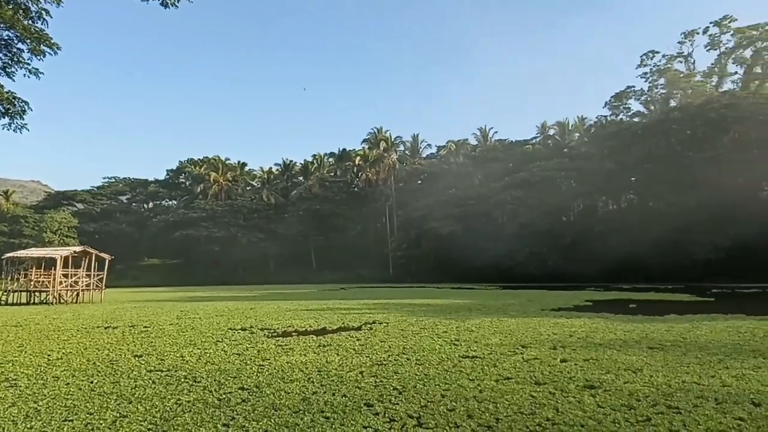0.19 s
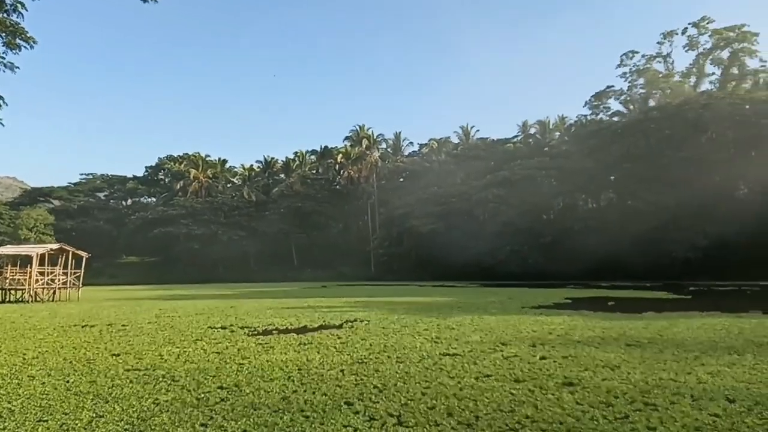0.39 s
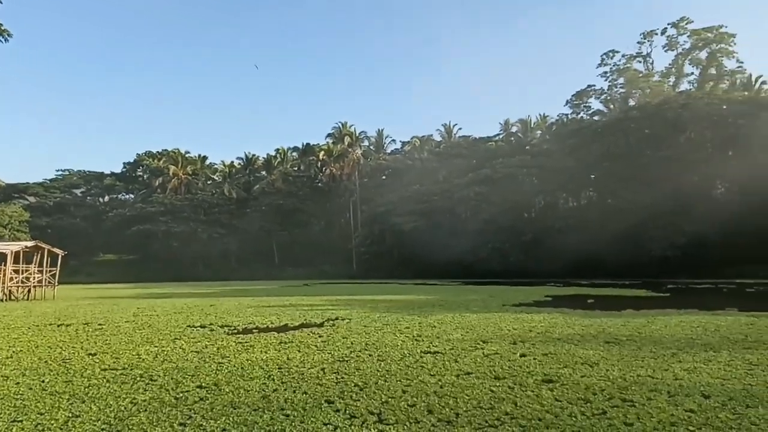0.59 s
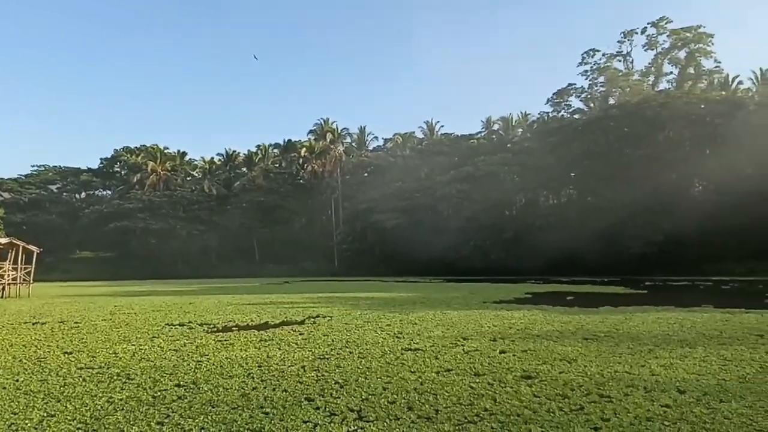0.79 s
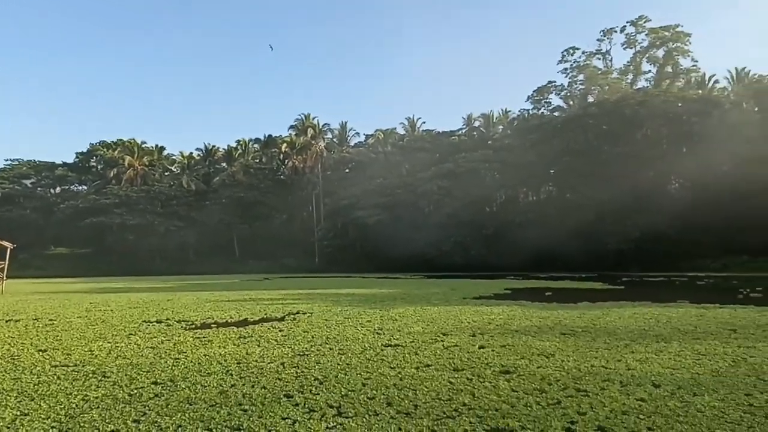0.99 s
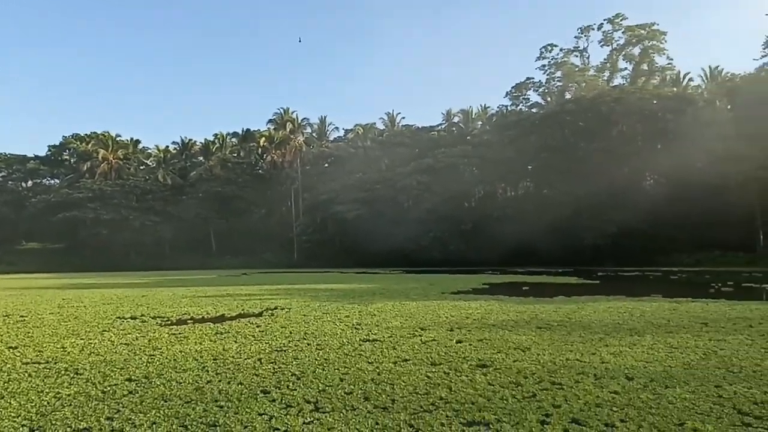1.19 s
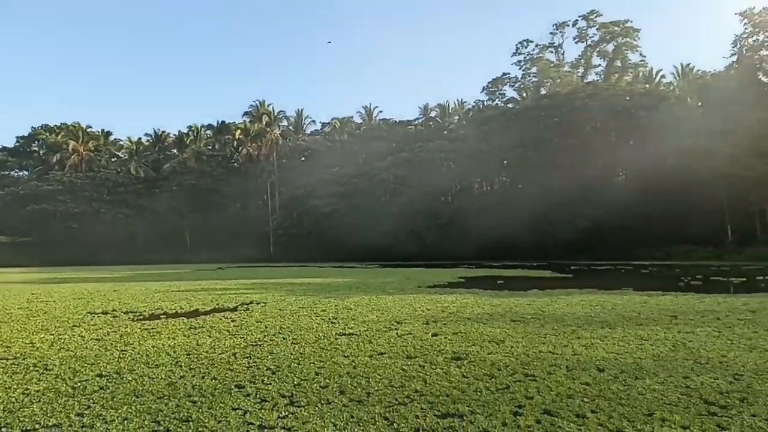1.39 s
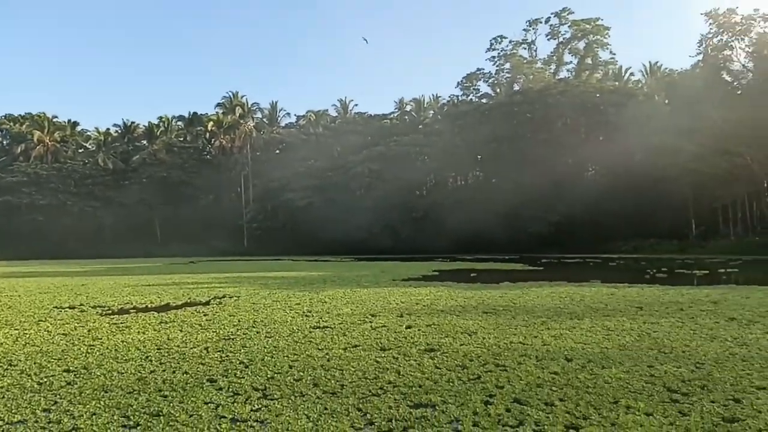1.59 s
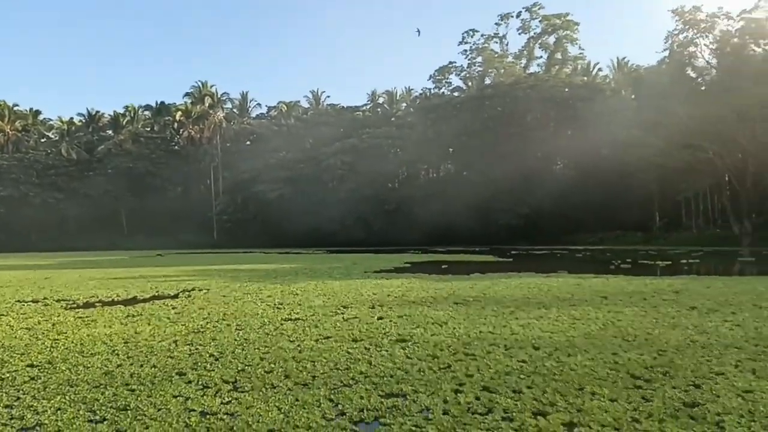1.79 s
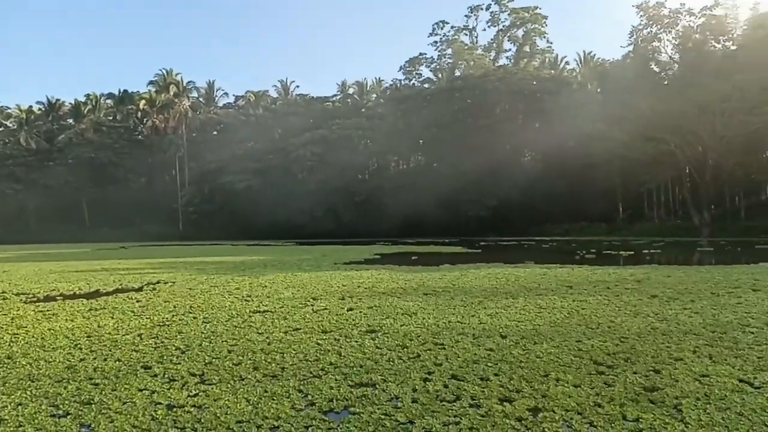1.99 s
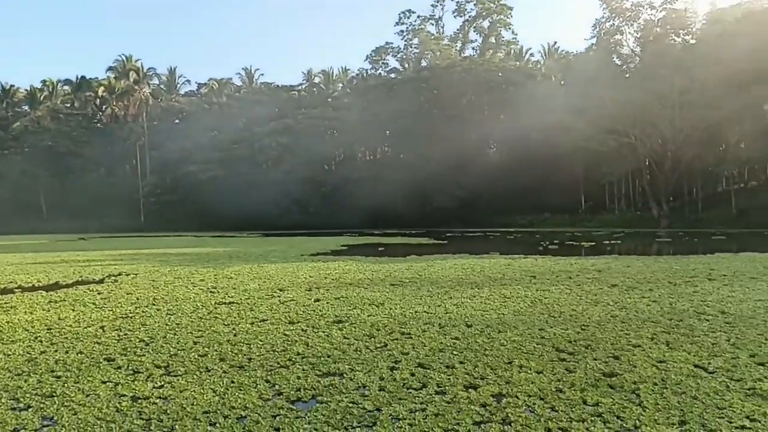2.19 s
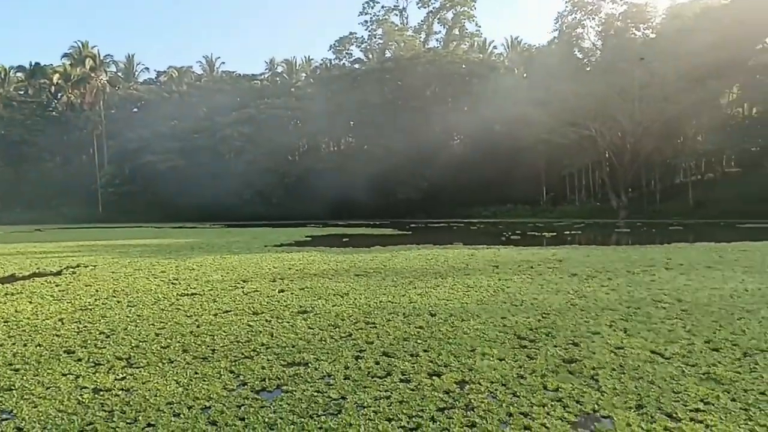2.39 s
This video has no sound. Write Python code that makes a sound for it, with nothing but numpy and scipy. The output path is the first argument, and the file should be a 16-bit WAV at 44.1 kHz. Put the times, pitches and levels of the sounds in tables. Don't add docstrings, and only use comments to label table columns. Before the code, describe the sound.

A distant hammer knocks on wood: faint taps from the start, a sharp hollow crack at 0.2 seconds, and rapid echoes off trees until about 0.35. Far quieter, birds whistle around 0.4, frogs pip until 1.0, and a chirp comes at 1.55. Hoarse hens squawk near 1.2 and 1.75; a frog coos at 1.9. Far birds, insects, low rumble and soft microphone air thumps lie beneath.

```python
import sys
import numpy as np
from scipy import signal
from scipy.fft import irfft
from scipy.io import wavfile
from scipy.ndimage import uniform_filter1d

SR = 44100
rng = np.random.default_rng(int(sys.argv[2]) if len(sys.argv) > 2 else 0)


def voltage_ratio(level):
    return 10 ** (np.asarray(level, float) / 20)


def put_to_file(sound):
    columns = np.atleast_2d(sound).T
    safe = np.clip(columns, -1, 1)
    whole_steps = np.round(safe * 32767)
    wavfile.write(sys.argv[1], SR, whole_steps.astype(np.int16))


N = 105840

# (time [s], peak level [dB])
KNOCKS = [(.001, -47), (0.07, -55), (.137, -53), (0.148, -50), (.2058, -27), (.2105, -29), (.224, -35),
          (.236, -38), (.2477, -30), (.2525, -34), (.266, -36), (0.272, -36), (.285, -39), (.302, -41),
          (.312, -44), (.335, -50)]
# (pitch [Hz], level [dB], fall time [s], 60 dB being lost in 0.7 of it)
WOOD_MODES = [(401.2, -13, 0.2), (517, -13, 0.08), (669, -20, 0.05), (1045, -1, 0.045), (1500, -12, .05),
              (1790, -1, 0.06), (2200, 0, 0.06), (2514, -8, .05), (3000, -4, 0.045), (3200, -8, .05),
              (3700, -3, 0.025)]
# (frequency [Hz], level [dB per Hz])
CRACK_COLOUR = [(150, -43), (400, -21), (1000, -9), (2200, -3), (3900, -20), (5000, -31), (8000, -48.5),
                (15000, -62)]
# (frequency [Hz], time to fall 60 dB [s])
SCATTER_T60 = [(300, .3), (1000, .17), (2500, .24), (10000, .08)]
# (time [s], length [s], from pitch [Hz], to pitch [Hz], level [dB])
WHISTLES = [(0.358, 0.03, 2780, 2940, -60), (.376, .06, 2950, 3020, -51), (.422, .093, 3040, 3130, -53.5),
            (.505, .06, 3140, 3270, -62), (0.418, .125, 3710, 3620, -54), (0.535, .125, 3660, 3620, -63),
            (.98, .04, 1920, 1850, -65), (1.012, 0.08, 1850, 1735, -57), (1.103, .02, 1715, 1690, -55),
            (1.128, .022, 1665, 1640, -55), (1.148, 0.055, 1620, 1490, -64), (1.219, 0.06, 3150, 3020, -65),
            (1.424, 0.068, 1755, 1706, -65), (1.476, .045, 2960, 2950, -63.5),
            (1.614, 0.129, 2850, 2743, -64), (1.775, 0.06, 2780, 3150, -62), (1.83, 0.088, 3200, 3240, -57),
            (1.935, 0.06, 3230, 3200, -68), (2.207, 0.089, 3590, 3660, -64),
            (2.287, 0.076, 3578, 3380, -58.5), (0.812, .06, 8120, 7700, -72), (.09, 0.057, 3540, 3400, -62)]
# (time [s], length [s], from pitch [Hz], to pitch [Hz], level [dB])
CHIRPS = [(1.24, .025, 2200, 2050, -58), (1.37, .03, 1700, 1450, -58), (1.535, .015, 2900, 2800, -60),
          (1.54, .018, 2050, 2300, -60), (1.555, .027, 2950, 2830, -46), (1.58, .03, 2800, 2600, -53),
          (1.895, .018, 1880, 1740, -55), (1.908, .03, 1750, 1450, -59), (1.95, .03, 2150, 2500, -63),
          (1.35, .03, 2250, 2350, -64), (.13, .02, 1060, 1050, -57), (1.905, .03, 2520, 2540, -64)]
# (time [s], length [s], from pitch [Hz], to pitch [Hz], level [dB])
RASPS = [(1.672, .05, 3350, 4000, -62), (1.672, .035, 3800, 4150, -63), (1.7, .07, 4150, 4150, -65),
         (1.983, .018, 4300, 3850, -63), (1.995, .028, 3800, 2950, -63), (2.033, .02, 3900, 4020, -59),
         (2.05, .045, 4000, 4170, -61), (2.03, .035, 3500, 3850, -64), (2.095, .04, 4150, 4100, -75),
         (.98, .06, 3200, 3050, -68), (1.02, .06, 2650, 2600, -69)]
# (time [s], peak level [dB])
TRILL = [(.523, -68), (.556, -66), (.590, -65), (.695, -68), (.768, -66), (.801, -65), (.838, -65),
         (1.010, -64), (1.045, -65), (1.080, -64), (1.254, -64), (1.289, -64), (1.324, -64)]
# (time [s], length [s], from pitch [Hz], to pitch [Hz], level [dB])
SQUAWKS = [
    (1.15, 0.04, 1800, 2300, -59),
    (1.179, 0.053, 2480, 2220, -52.5),
    (1.71, 0.025, 2000, 2130, -59),
    (1.718, 0.058, 2700, 2350, -54.5),
    (1.745, 0.055, 2250, 2070, -54.5),
    (1.79, .055, 2400, 2450, -62),
    (1.198, 0.13, 1700, 1627, -62.5),
]
# (time [s], peak level [dB])
PIPS = [
    (.381, -58),
    (.416, -54),
    (.499, -58.5),
    (.665, -56),
    (.755, -55.5),
    (.904, -58),
    (.988, -61),
]
# (time [s], length [s], pitch [Hz], level [dB])
COOS = [
    (0.091, 0.17, 720, -70),
    (0.6, 0.054, 740, -73.5),
    (0.73, 0.05, 780, -78),
    (.15, .04, 430, -66),
    (.42, 0.116, 470, -78),
    (.6, 0.078, 460, -77),
    (1.391, 0.1, 717, -73.5),
    (1.896, 0.11, 704.4, -64),
    (1.485, 0.039, 1070, -75.5),
]
# (frequency [Hz], level [dB per Hz])
FAR_COLOUR = [(700, -54), (1200, -16.5), (1700, 0.5), (2300, 3), (3100, -0.5), (3950, -2.5), (4250, -5),
              (5600, -37.5)]
# (time [s], level [dB])
FAR_LEVEL = [(0, -56), (.5, -59.5), (.85, -65.5), (1.2, -64), (1.45, -63.5), (1.75, -59.5), (2.05, -63),
             (2.4, -62.5)]
# (time [s], length [s], pitch [Hz], wing strokes [per s], level [dB])
BUZZES = [
    (1.8, .42, 9240, 67.9, -75),
    (0, .32, 9230, 67.9, -81),
    (.6, 1.5, 8550, 29, -83),
]
# (frequency [Hz], level [dB per Hz])
INSECT_COLOUR = [(3900, -39.5), (4500, -1.5), (5000, 0), (5500, -13.5), (6400, -15.5), (8600, -4.5),
                 (10100, -10.5), (11000, -27)]
# (frequency [Hz], level [dB per Hz])
CICADA_COLOUR = [(6400, -13), (6900, 0), (7200, 10), (7600, 6.5), (8100, -31)]
# (time [s], depth [0 to 1])
CICADA_DEPTH = [(0, 0.076), (1.4, 0.074), (2.4, 0.45)]
# (frequency [Hz], level [dB per Hz])
RUMBLE_COLOUR = [(20, -20), (40, -27), (115, -2), (280, -14), (650, -17.5), (1000, -19.5), (1400, -16),
                 (2500, -56)]
# (frequency [Hz], level [dB per Hz])
GUST_COLOUR = [(15, -20), (40, -13.5), (110, 29), (200, -28), (400, -52)]
# (time [s], level [dB])
RUMBLE_LEVEL = [(0, 13.5), (.2, -10.5), (.3, 3.5), (.52, 4.5), (.58, -0.5), (2.4, -2.5)]
# (time [s], peak level [dB])
THUMPS = [
    (.275, -60),
    (0.341, -55.5),
    (0.431, -61),
    (.5, -56),
    (1.518, -62.5),
    (1.74, -67),
    (2.19, -62),
]
# (frequency [Hz], level [dB per Hz])
HISS_COLOUR = [(8000, -34), (10500, 11), (12500, -11.5), (16000, -1)]


def evened(x):
    return x / np.sqrt(np.mean(x ** 2) + 1e-20)


def read(points, hz):
    f, value = np.transpose(points)
    return np.interp(np.log(hz + 1), np.log(f + 1), value)


def over_time(points):
    return np.interp(np.arange(N) / SR, *np.transpose(points))


def add(mix, s, sound):
    part = mix[max(round(s * SR), 0):][:len(sound)]
    part += sound[:len(part)]


def slow(length, span):
    window = np.hanning(int(2.1 * span) + 3)
    drift = signal.oaconvolve(rng.standard_normal(length + 800), window, "same")
    return evened(drift)[400:-400]


def colour(x, points):
    gain_db = np.maximum(read(points, np.fft.rfftfreq(4096, 1 / SR)), -100)
    log_gain = np.log(voltage_ratio(gain_db))
    phase = -signal.hilbert(np.r_[log_gain, log_gain[-2:0:-1]]).imag[:2049]
    response = irfft(np.exp(log_gain + 1j * phase))[:2048]
    return signal.oaconvolve(x, response)[:len(x)]


def tail(points, rise_s):
    taps = rng.standard_normal(SR) * (rng.random(SR) < .06)
    hz, t, z = signal.stft(taps, SR, nperseg=128)
    t60 = np.maximum(read(points, hz), .02)[:, None]
    out = signal.istft(z * voltage_ratio(-60 * t / t60), SR, nperseg=128)[1][:SR]
    out = out * np.minimum(np.arange(SR) / SR / rise_s, 1)
    return out / np.linalg.norm(out)


def wash(points, patchy_db, swell_db):
    frames, hz = N // 256 + 5, np.fft.rfftfreq(1024, 1 / SR)
    a, b, patches = rng.standard_normal((frames, 513, 3)).T
    patches = uniform_filter1d(patches, 8, 0)
    patches = evened(uniform_filter1d(patches, 10, 1))
    level = read(points, hz)[:, None] + patchy_db * patches + swell_db * slow(frames, 4.4)
    z = (a + 1j * b) * voltage_ratio(level)
    return evened(signal.istft(z, nperseg=1024, noverlap=768)[1][:N])


def note(length, from_hz, to_hz, db, hoarse=0):
    u = np.arange(0, length, 1 / SR) / length

    def drift(span):
        return slow(N // 8, span)[:len(u)]

    hz = (from_hz + (to_hz - from_hz) * u) * (1 + .003 * drift(120))
    edge = np.sin(np.pi / 2 * np.clip(np.minimum(u, 1 - u) / .2, 0, 1))
    turn = 2 * np.pi * np.cumsum(hz) / SR
    rasp = drift(80) * np.sin(turn) + drift(80) * np.cos(turn)
    voice = np.sqrt(2 - 2 * hoarse) * np.sin(turn) + np.sqrt(hoarse) * evened(rasp)
    return edge * voltage_ratio(db + 1.4 * drift(220)) * voice


def throbbing(sound, throbs_per_s, depth):
    return sound * (1 - depth * np.cos(2 * np.pi * throbs_per_s * np.arange(len(sound)) / SR))


def wood_ring(t, rise_s):
    detune = 1 + .01 * rng.standard_normal(len(WOOD_MODES))
    ring = np.zeros(len(t))
    for (hz, db, t60), shift in zip(WOOD_MODES, detune):
        rise = np.minimum(t / rise_s * min(hz / 1000, 1) ** 3, 1)
        ring += voltage_ratio(db - 60 * t / (.7 * t60)) * np.sin(2 * np.pi * hz * shift * t) * rise
    return ring


def knocks():
    t, out = np.arange(6000) / SR, np.zeros(N)
    rise_s, crack_db, scatter_db, tick_db = .0014, 3, -4.5, -49
    for s, db in KNOCKS:
        ring = wood_ring(t, rise_s)
        burst = rng.standard_normal(6000) * voltage_ratio(-60 * t / 0.026) * np.minimum(t / rise_s, 1)
        crack = colour(burst, CRACK_COLOUR)
        blow = ring / abs(ring).max() + voltage_ratio(crack_db) * crack / abs(crack).max()
        returns = signal.oaconvolve(blow, tail(SCATTER_T60, 0.0055))
        add(out, s, voltage_ratio(db) * (np.pad(blow, (0, SR - 1)) + voltage_ratio(scatter_db) * returns))
    s, db = max(KNOCKS, key=lambda row: row[1])
    tick = np.diff(rng.standard_normal(601), 2) * voltage_ratio(-60 * t[:599] / .015)
    add(out, s, voltage_ratio(db + tick_db) * tick)
    return out


def birds():
    mix = np.zeros(N)
    for calls, hoarse in ((WHISTLES, .05), (CHIRPS, .08), (RASPS, .3)):
        for s, *row in calls:
            add(mix, s, note(*row, hoarse))
    for s, db in TRILL:
        add(mix, s - .002, note(.018, 4700, 4230, db - 4.5))
    return mix


def hens():
    mix = np.zeros(N)
    for s, *row in SQUAWKS:
        add(mix, s, throbbing(note(*row, .55), throbs_per_s=105, depth=.6))
    return mix


def frogs():
    mix = np.zeros(N)
    for s, db in PIPS:
        add(mix, s - .002, note(0.013, 2120, 1980, db - 2.5))
    for s, length, hz, db in COOS:
        coo = note(length, .98 * hz, 1.02 * hz, db, .2)
        add(mix, s, throbbing(coo, throbs_per_s=51.6, depth=0.68))
    return mix


def callers():
    mix = birds() + hens() + frogs()
    trees = tail([(500, 0.23), (1500, .35), (9000, .35)], 0.032)
    return mix + voltage_ratio(-8) * signal.oaconvolve(mix, trees)[:N]


def chorus():
    notes, kinds, notes_per_s = np.zeros(N), 40, 250
    for _ in range(kinds):
        hz, glide, length = rng.uniform([1400, -.2, .01], [4400, .15, .06])
        u = np.arange(0, length, 1 / SR) / length
        turn = 2 * np.pi * np.cumsum(hz * (1 + glide * u)) / SR
        grain = np.hanning(len(u)) * np.sin(turn) * voltage_ratio(read(FAR_COLOUR, hz))
        starts = rng.random(N) < notes_per_s / kinds / SR
        train = voltage_ratio(3.8 * np.minimum(rng.exponential(1, N), 2)) * starts
        notes += signal.oaconvolve(train, grain)[:N]
    notes += signal.oaconvolve(notes, tail([(500, 0.86), (9000, 0.13)], 0.018))[:N]
    merged = wash(FAR_COLOUR, patchy_db=2.5, swell_db=-1.97)
    return voltage_ratio(over_time(FAR_LEVEL)) * (merged + voltage_ratio(-5) * evened(notes))


def buzz():
    out = np.zeros(N)
    for s, length, hz, rate, db in BUZZES:
        t = np.arange(0, length, 1 / SR)
        decay = np.exp(-np.pi * 80 * (t * rate % 1) / 68)
        ring = decay * np.sin(2 * np.pi * hz * t + 0.37 * slow(N, 300)[:len(t)])
        add(out, s, voltage_ratio(db) * evened(ring) * np.sin(np.pi * t / length) ** .5)
    return out


def cicadas():
    throb = 1 + over_time(CICADA_DEPTH) * np.sin(2 * np.pi * 64 * np.arange(N) / SR)
    return voltage_ratio(-72.5) * throb * wash(CICADA_COLOUR, patchy_db=2.0, swell_db=0.4)


def insects():
    return voltage_ratio(-73) * wash(INSECT_COLOUR, patchy_db=-1, swell_db=1.0) + buzz() + cicadas()


def thumps():
    length = 0.0447
    t, out = np.arange(0, length, 1 / SR), np.zeros(N)
    for (s, db), pitch in zip(THUMPS, rng.uniform(0.81, 1.28, len(THUMPS))):
        add(out, s - length / 2, voltage_ratio(db) * np.hanning(len(t)) * np.sin(2 * np.pi * 115.3 * pitch * t))
    return out


def rumble():
    distant = voltage_ratio(-71.5) * wash(RUMBLE_COLOUR, patchy_db=2, swell_db=0.33)
    gusts = voltage_ratio(-77.5) * wash(GUST_COLOUR, patchy_db=2, swell_db=2)
    return voltage_ratio(over_time(RUMBLE_LEVEL)) * (distant + gusts) + thumps()


def hiss():
    return voltage_ratio(-94) * wash(HISS_COLOUR, patchy_db=0, swell_db=1)


def scene():
    return (knocks() + callers() + chorus() + insects() + rumble() + hiss())[None]


def low_pass(x):
    return signal.sosfilt(signal.butter(12, 15500, fs=SR, output="sos"), x)


def record(dry):
    return low_pass(dry)


dry = scene()
out = record(dry)
put_to_file(out)
```